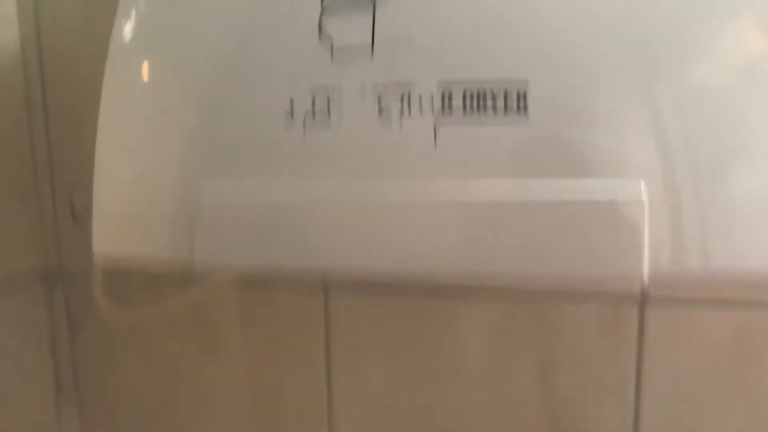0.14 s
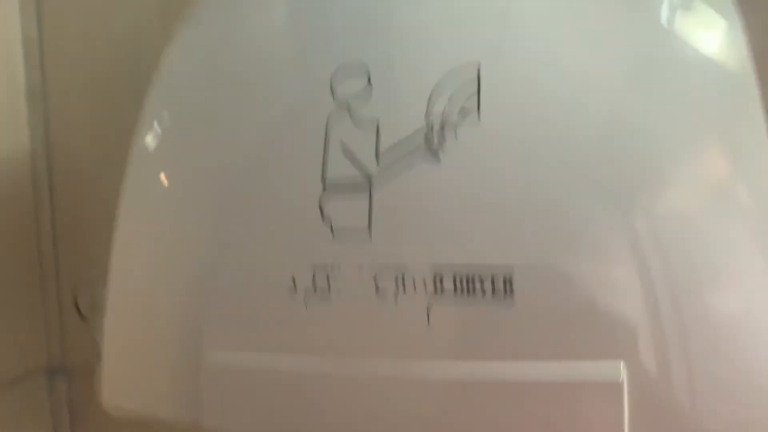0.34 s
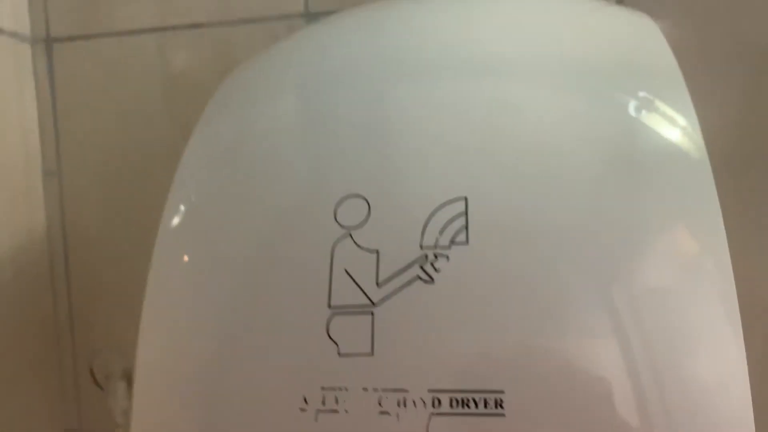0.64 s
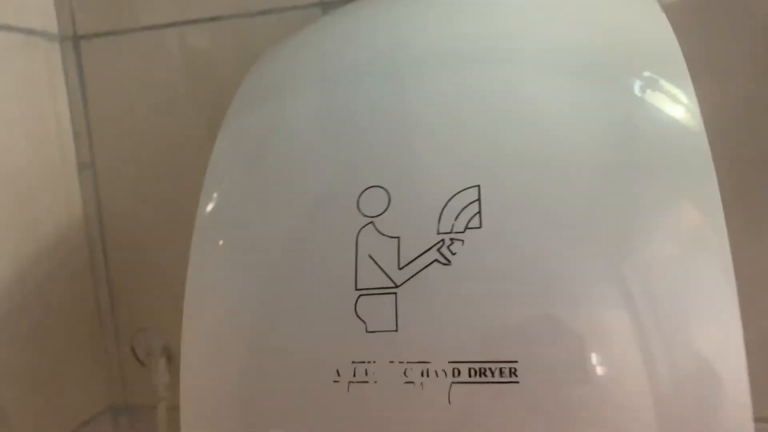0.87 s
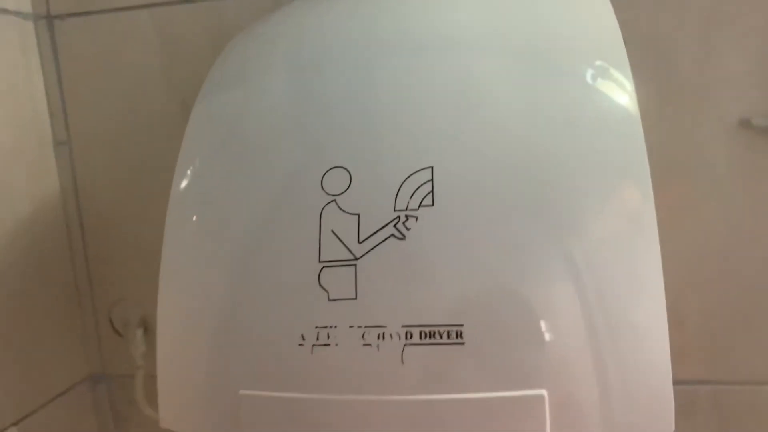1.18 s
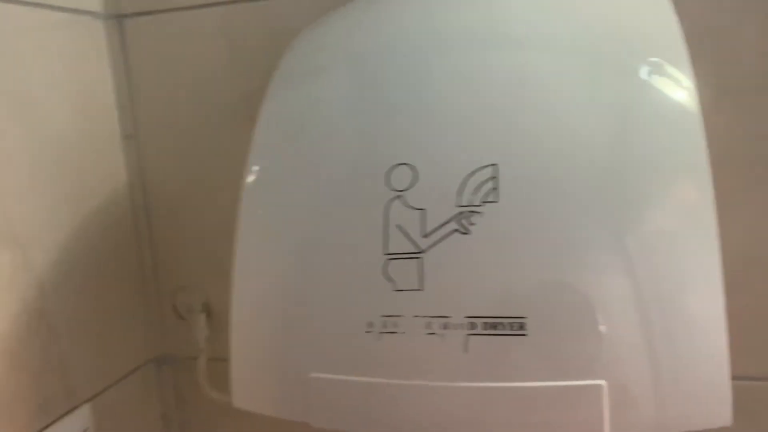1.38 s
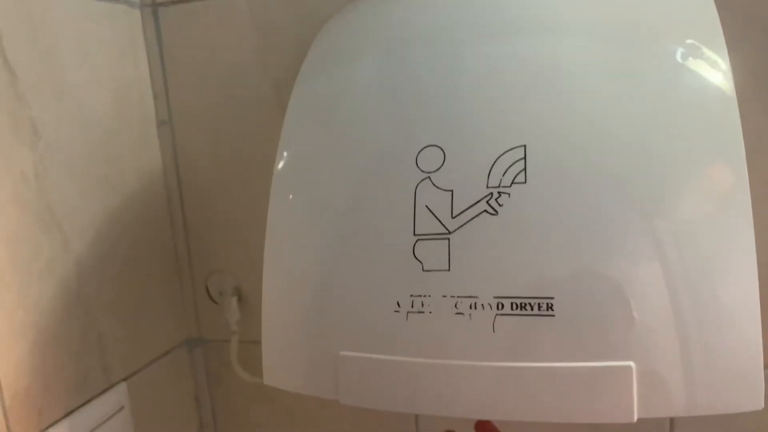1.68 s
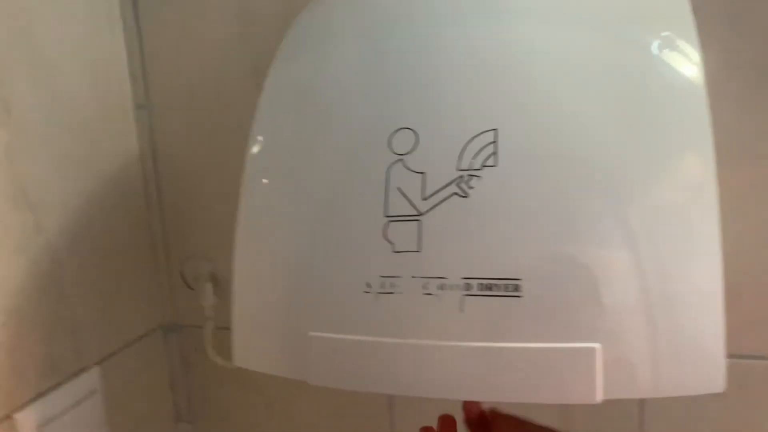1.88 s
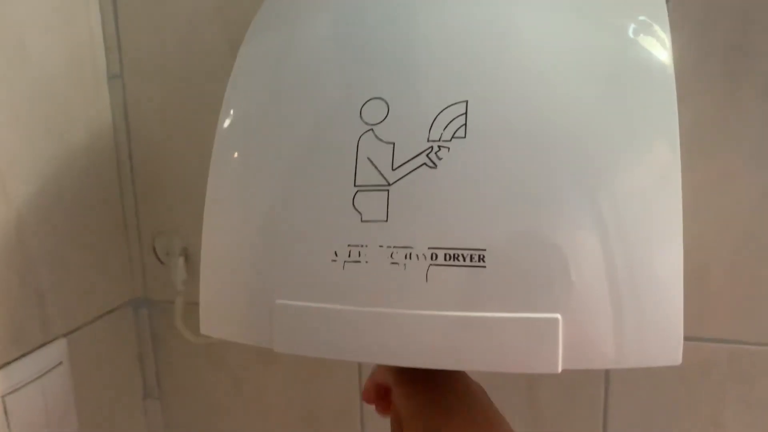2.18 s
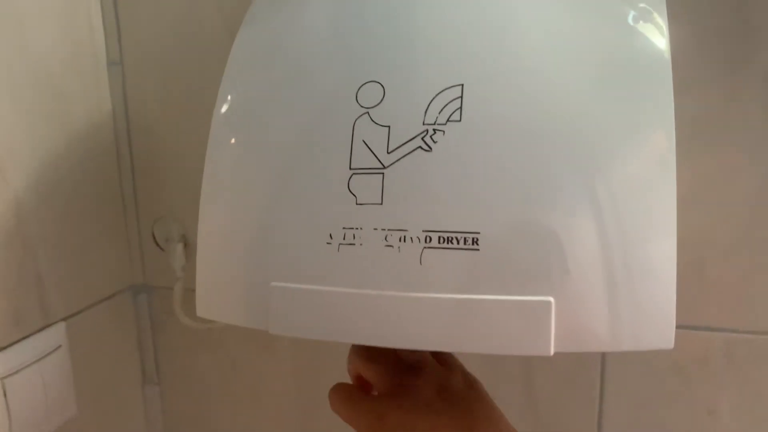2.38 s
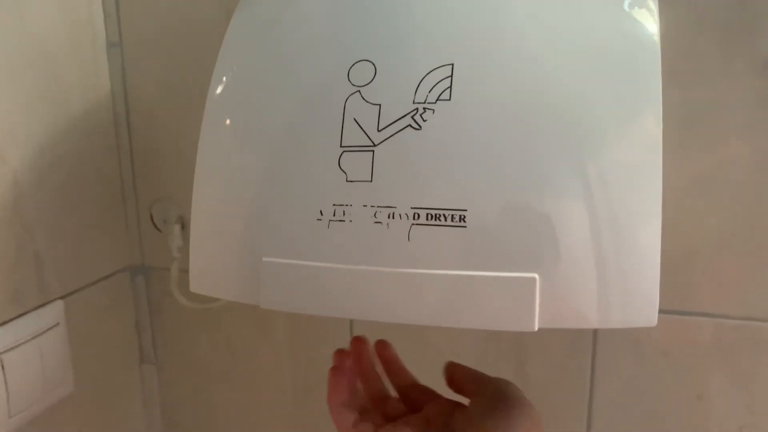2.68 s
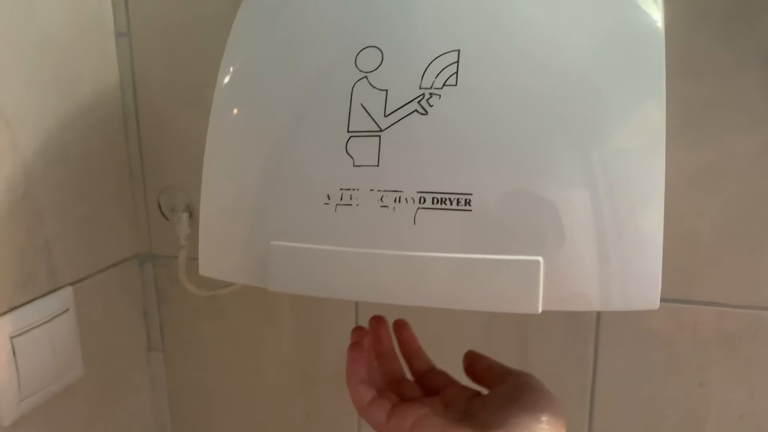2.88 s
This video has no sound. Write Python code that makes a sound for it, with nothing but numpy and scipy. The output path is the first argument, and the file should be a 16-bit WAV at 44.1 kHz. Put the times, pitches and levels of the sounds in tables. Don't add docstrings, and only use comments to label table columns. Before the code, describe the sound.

A hand dryer clatters on with a relay click and blows a steady roaring rush of air.

```python
import sys
import numpy as np
from scipy import signal
from scipy.fft import rfft, irfft, next_fast_len
from scipy.io import wavfile
from scipy.ndimage import uniform_filter1d

SR = 44100
rng = np.random.default_rng(int(sys.argv[2]) if len(sys.argv) > 2 else 0)


def dump_mix(stems):
    frames = np.atleast_2d(stems).T
    limited = np.clip(frames, -1, 1)
    pcm = np.round(limited * 32767).astype(np.int16)
    wavfile.write(sys.argv[1], SR, pcm)


def decibels_to_gain(level_db):
    exponent = np.asarray(level_db, float) / 20
    return 10 ** exponent


N = 133623

# pitch in [Hz], level in [dB].
RUMBLE_SPECTRUM = [(25, -50), (45, -3.5), (100, -8.5), (300, -13.5), (600, -19), (2000, -28), (5000, -45.5),
                   (9000, -66)]
# pitch in [Hz], width in [Hz], lift in [dB].
ROOM_MODES = [(55.5, 13, 13), (83.3, 13, 10), (134.8, 15, 17.5), (207, 5.9, 3.5), (209, 15, 5),
              (275.3, 14, 4.5), (293.8, 9.9, 8.5), (342, 13.7, 7), (381.7, 4.7, 6), (429, 24, 2.5)]
# time in [s], level in [dB].
HUM_LEVEL = [(0, -53.5), (.2, -56), (.3, -49), (.45, -54.5), (.8, -50.5), (1.1, -50.5), (1.6, -50.5),
             (3.03, -61)]
# time in [s], level in [dB].
DRONE_LEVEL = [(0, -77), (.55, -68), (.75, -54.5), (1.1, -53), (1.25, -67), (3.03, -44)]
# time in [s], level in [dB].
DEEP_NOTE_LEVEL = [(0, -42.5), (.25, -50), (.5, -42.5), (.8, -59.5), (3.03, -49)]
# pitch in [Hz], level in [dB].
RUSTLE_SPECTRUM = [(150, -8), (250, -1), (480, 14), (700, 3), (1000, -34)]
# pitch in [Hz], level in [dB].
FAR_SPECTRUM = [(500, -4.5), (1000, -3.5), (1400, -1.5), (2300, -8.5), (4000, -30), (7000, -38)]
# pitch in [Hz], level in [dB].
MIC_HISS_SPECTRUM = [(3000, -31), (7000, -6), (11300, 8), (15600, -6)]
# start in [s], level in [dB], low edge
# in [Hz], high edge in [Hz], decay in [s].
FINGER_TICKS = [(.4385, -41.5, 1300, 3000, 0.0011), (.439, -55, 3000, 5200, .001),
                (.439, -60, 5000, 12000, .001), (.543, -69, 3000, 7000, .001),
                (.6432, -49.5, 3400, 4870, 0.0011), (.644, -48, 700, 3000, .001),
                (.662, -51, 1400, 2400, .001), (.662, -53, 2600, 4500, .001),
                (.663, -65, 6000, 10000, .001), (.676, -64, 7600, 9200, 0.0017),
                (.6805, -46, 1300, 2610, 0.0011), (.6805, -52, 2800, 4200, 0.0012),
                (.681, -55.5, 7800, 9200, .002), (.6815, -60, 5640, 7000, .001),
                (.681, -66, 9500, 14500, .001), (0.6845, -61, 7600, 9300, 0.0012),
                (1.214, -55, 980, 7500, 0.0043), (1.221, -46, 1000, 7500, 0.0044)]
# start in [s], level in [dB], crack in [dB], extra deep ringing in [dB].
RELAY_BLOWS = [
    (1.2254, -28.5, -1.5, -15),
    (1.228, -25, -5.5, -9),
    (1.233, -29.5, -4.5, 4),
    (1.239, -29.5, -5.5, -1),
    (1.2441, -31, -5, -3),
    (1.252, -34, -1.5, -2.5),
]
# pitch in [Hz], level in [dB], time to fall 60 dB in [s].
COVER_MODES = [(321, 0, 0.07), (377, -3, 0.09), (623, -5, .04), (820, 0, 0.04), (900, -2, 0.05),
               (1045, 4, 0.055), (1157, -3, .03), (1580, -3, 0.025), (1737, -1, 0.035), (2017, 0, 0.035),
               (2440, -8, .015), (2960, -14, .012), (6950, -3, 0.018), (11300, -14, 0.02)]
# pitch in [Hz], level in [dB].
CRACK_SPECTRUM = [(600, 4.5), (2000, 3), (4300, -9.5), (8200, -14), (10000, -3), (13000, -2.5),
                  (15700, -0.5), (17000, -6.5)]
# pitch in [Hz], level in [dB], time to fall 60 dB in [s].
REBOUND_MODES = [(890, -40, 0.14), (1050, -43, .12), (2050, -33, 0.1)]
# pitch in [Hz], time to fall 60 dB in [s].
TILE_ECHO = [(250, 1), (1000, 0.75), (4000, 0.56), (12000, 0.32)]
# time in [s], speed from 0 to 1 [share], boom with the hand under the outlet in [dB].
FAN_RUN = [(1.23, 0.43, 5.5), (1.398, 0.33, 3), (1.5, 0.47, 3.5), (1.6, 0.58, 1.5), (1.699, 0.82, -1),
           (1.78, 0.89, 0.5), (1.852, 0.94, 2), (2.0, 0.98, 1), (2.15, 1, 1), (2.3, 1., -1),
           (2.45, 0.98, -1), (2.6, .99, 0), (2.72, 1, 0.5), (2.85, .99, -1.5), (2.97, 0.99, 1.5),
           (3.03, 1., 1)]
# pitch in [Hz], level in [dB].
BOOM_SPECTRUM = [(60, -21), (110, -14), (200, -9), (300, -1.5), (420, -7.5), (600, -17), (1000, -84)]
# pitch in [Hz], level in [dB].
FAN_ROOM_NOTES = [(138, -41), (217, -47.5), (268, -45), (297, -48.5), (322, -48), (378, -54)]
# pitch in [Hz], level in [dB].
FIZZ_SPECTRUM = [(4500, -15), (6500, -5), (8500, 2.5), (11000, -4.5), (13000, -9.5), (15700, -14)]
# pitch in [Hz], level in [dB].
ROAR_SPECTRUM = [(200, -68), (450, -6), (800, -1.5), (1200, -1), (1700, -5), (2200, -14.5), (3200, -21),
                 (5000, -61)]
# pitch in [Hz], level in [dB].
HISS_SPECTRUM = [(1200, -7.5), (2600, -2.5), (4000, -6), (5500, -7.5), (7000, -14), (9000, -70)]
# pitch in [Hz], width in [Hz], lift in [dB].
HOUSING_MODES = [(700, 15, 6.5), (817, 19, 4), (851, 18, 4.5), (896, 16, 6.5), (1079, 38, 5), (1142, 22, 2),
                 (1198, 16, 6), (1609, 49, 8), (1771, 28, 7), (2326, 230, 5), (2700, 45, 1.5),
                 (2950, 45, 6), (3820, 220, 7.5), (4146, 81, 6)]
# time in [s], level change in [dB].
BLADE_SWING_DB = [(1.72, -7), (1.82, 5.5), (1.88, 2), (2.07, -1), (2.15, -3), (2.23, -3), (2.4, 5),
                  (2.5, 3), (2.56, 1), (2.75, 0.5), (3.03, -16)]
# pitch in [Hz], likeness from 0 to 1 [share].
ROOM_LIKENESS = [(100, 0.86), (250, 0.86), (450, 1), (700, 0.4), (1500, 0), (5500, 0.05), (7500, 0.15),
                 (10000, 1.44)]
# pitch in [Hz], likeness from 0 to 1 [share].
FAN_LIKENESS = [(100, 0.52), (200, 0.8), (300, 0.63), (500, 0.19), (1500, 0.12), (5500, 0.037),
                (7500, 0.99), (10000, 0.87)]
# pitch in [Hz], difference in [dB].
LEFT_LEAN = [(150, 1), (700, 1.5), (1600, 2.5), (2300, 1), (5000, -3), (7200, -1)]
# pitch in [Hz], phase in [cycles].
RIGHT_AHEAD = [(6900, 0), (8500, .5), (11050, 1), (13350, 1.5), (15500, 2)]
# time in [s], edge in [Hz].
MONO_BASS_EDGE = [(0, 417), (1.1, 390), (1.5, 283), (1.9, 206), (2.4, 151), (2.7, 92), (3.03, 55)]


def read(points, hz):
    f, value = np.transpose(points)
    return np.interp(np.log(hz + 1), np.log(f + 1), value)


def follow(points, t):
    return np.interp(t, *np.transpose(points))


def evened(x):
    return x / np.sqrt(np.mean(x ** 2) + 1e-20)


def colour(x, spectrum, peaks=()):
    hz = np.fft.rfftfreq(x.shape[-1], 1 / SR)
    lift_db = sum(db / (1 + (2 * (hz - f) / width) ** 2) for f, width, db in peaks)
    return evened(irfft(rfft(x) * decibels_to_gain(read(spectrum, hz) + lift_db), x.shape[-1]))


def air(patchy_db, flicker_db):
    frames = N // 128 + 5
    a, b = rng.standard_normal((2, 2, frames, 257))
    patches = uniform_filter1d(rng.standard_normal((frames, 257)), 25, 0)
    patches = evened(uniform_filter1d(patches, 6, 1))
    flicker = evened(uniform_filter1d(rng.standard_normal((frames, 1)), 8, 0))
    z = (a + 1j * b) * decibels_to_gain(patchy_db * patches + flicker_db * flicker)
    noise = signal.istft(z.transpose(0, 2, 1), nperseg=512, noverlap=384)[1]
    return evened(noise[:, :N])


def whistle(hz, width_hz, waver=0.5):
    r = np.exp(-np.pi * width_hz / SR)
    noise = rng.standard_normal((2, N)) + 1j * rng.standard_normal((2, N))
    slow = signal.lfilter([1 - r], [1, -r], noise)
    slow = 1 + waver * slow / np.sqrt(np.mean(abs(slow) ** 2))
    turns = np.cumsum(hz * np.ones(N)) / SR
    return evened((slow * np.exp(2j * np.pi * turns)).real)


def ringing(modes, t):
    return sum(decibels_to_gain(db - 60 * t / t60) * np.sin(2 * np.pi * (hz * t + rng.random()))
               for hz, db, t60 in modes)


def add(mix, s, sound):
    part = mix[round(s * SR):][:len(sound)]
    part += sound[:len(part)]


def room_tone():
    t = np.arange(N) / SR
    rumble = decibels_to_gain(-42.5) * colour(air(0.8, 0.1), RUMBLE_SPECTRUM, ROOM_MODES)
    hum = decibels_to_gain(follow(HUM_LEVEL, t)) * whistle(296.8, 5.4, waver=0.44)
    drone = decibels_to_gain(follow(DRONE_LEVEL, t)) * whistle(197, 16.0, waver=0.66)
    deep_note = decibels_to_gain(follow(DEEP_NOTE_LEVEL, t)) * whistle(84.9, 3.3)
    rustle_db = -55.5 - 6.3 * ((t - 0.7) / 0.13) ** 2
    rustle = decibels_to_gain(rustle_db) * colour(air(1.7, 1.1), RUSTLE_SPECTRUM)
    far_t60 = 1.7
    far = decibels_to_gain(-48 - 60 * t / far_t60) * colour(air(0.62, 0.67), FAR_SPECTRUM)
    mic_hiss = decibels_to_gain(-82.5) * colour(rng.standard_normal((2, N)), MIC_HISS_SPECTRUM)
    return rumble + hum + drone + deep_note + rustle + far + mic_hiss


def ticks():
    t, out = np.arange(1200) / SR, np.zeros((2, N))
    rise_s = 0.00073
    for s, db, low_hz, high_hz, decay_s in FINGER_TICKS:
        band = signal.butter(3, [low_hz, high_hz], "bandpass", fs=SR, output="sos")
        shape = np.minimum(t / rise_s, 1) * np.exp(-t / decay_s)
        both = rng.standard_normal(len(t))
        for side in out:
            noise = both + 1.1 * rng.standard_normal(len(t))
            puff = signal.sosfilt(band, noise * shape)
            add(side, s, decibels_to_gain(db) * puff / abs(puff).max())
    return out


def relay():
    t, out = np.arange(9000) / SR, np.zeros(N)
    rise_s, crack_decay_s = 0.0017, 0.0048
    for s, db, crack_db, deep_db in RELAY_BLOWS:
        modes = [(hz, d + deep_db * (hz < 1500), t60) for hz, d, t60 in COVER_MODES]
        ring = ringing(modes, t) / 2.33
        crack = colour(rng.standard_normal(len(t)), CRACK_SPECTRUM) * np.exp(-t / crack_decay_s)
        add(out, s, decibels_to_gain(db) * np.minimum(t / rise_s, 1) * (ring + decibels_to_gain(crack_db) * crack))
    return out


def rebound():
    t, out = np.arange(12000) / SR, np.zeros(N)
    rise_s = 0.013
    swell = np.minimum(t / rise_s, 1) ** 2
    add(out, 1.321, np.sqrt(2) * swell * ringing(REBOUND_MODES, t))
    return out


def tiles(x):
    taps = np.zeros((2, SR))
    at = np.arange(100, SR - 20, 20) + rng.integers(0, 20, (2, (SR - 101) // 20))
    np.put_along_axis(taps, at, rng.choice([-1., 1.], at.shape), 1)
    hz, t, z = signal.stft(taps, SR, nperseg=256)
    fade = decibels_to_gain(-60 * t / read(TILE_ECHO, hz)[:, None])
    tail = signal.istft(z * fade, SR, nperseg=256)[1]
    return signal.fftconvolve(x[None], tail / np.linalg.norm(tail[0]), axes=1)[:, :N]


def fan():
    t, (s, speed, hand_db) = np.arange(N) / SR, np.transpose(FAN_RUN)
    speed = np.clip(np.interp(t, s, speed, left=0), 0, 1.2)
    speed = uniform_filter1d(speed, 2000)
    hand_db = np.interp(t, s, hand_db)
    boom = decibels_to_gain(-35.5 + hand_db) * speed ** 1.85 * colour(air(1.94, 0.79), BOOM_SPECTRUM, ROOM_MODES)
    notes = sum(decibels_to_gain(db) * whistle(hz, 24.5, waver=0.71) for hz, db in FAN_ROOM_NOTES)
    notes = decibels_to_gain(3.2 * hand_db) * speed ** 2.26 * notes
    fizz = decibels_to_gain(-51.5) * speed ** 6.1 * colour(air(0.76, 0.87), FIZZ_SPECTRUM)
    roar = decibels_to_gain(-32.5) * speed ** 1.95 * colour(air(1.45, 0.35), ROAR_SPECTRUM, HOUSING_MODES)
    hiss = decibels_to_gain(-42.5) * speed ** 3.08 * colour(air(1.0, 0.48), HISS_SPECTRUM, HOUSING_MODES)
    full_hz, run_up_s = 761, 0.173
    blade_hz = full_hz * (1 - np.exp(-np.maximum(t - s[0], 0) / run_up_s))
    blade_db = -44 + follow(BLADE_SWING_DB, t)
    blade = decibels_to_gain(blade_db) * speed ** 3.2 * whistle(blade_hz, 5, waver=0.57)
    return boom + notes + fizz + roar + hiss + blade


def pair(x, likeness):
    size = next_fast_len(N + 4096)
    hz, (left, other) = np.fft.rfftfreq(size, 1 / SR), rfft(x, size)
    same = np.clip(read(likeness, hz), 0, 1)
    lean = decibels_to_gain(read(LEFT_LEAN, hz) / 2)
    ahead = np.exp(2j * np.pi * read(RIGHT_AHEAD, hz))
    right = same * ahead * left + np.sqrt(1 - same ** 2) * other
    return irfft(np.array([left * lean, right / lean]), size)[:, :N]


def scene():
    click = relay()
    room = room_tone() + decibels_to_gain(0.5) * click + decibels_to_gain(2.5) * tiles(click)
    mix = pair(room, ROOM_LIKENESS) + pair(fan(), FAN_LIKENESS) + ticks() + rebound()
    fade_in = np.minimum(np.arange(N) / 300, 1)
    return mix * fade_in


def top_cut(x):
    return signal.sosfilt(signal.butter(12, 16940, fs=SR, output="sos"), x)


def record(dry):
    mid, side = (dry[0] + dry[1]) / 2, (dry[0] - dry[1]) / 2
    hz, t, z = signal.stft(side, SR, nperseg=2048, noverlap=1536)
    octaves = np.log2((hz[:, None] + 1) / follow(MONO_BASS_EDGE, t))
    slope_db = 102
    z = z * decibels_to_gain(slope_db * np.minimum(octaves, 0))
    side = signal.istft(z, SR, nperseg=2048, noverlap=1536)[1][:N]
    treble_cut = signal.firwin(511, 15750, window=("kaiser", 8), fs=SR)
    mix = signal.oaconvolve([mid + side, mid - side], treble_cut[None], "same")
    return top_cut(mix)


dry = scene()
out = record(dry)
dump_mix(out)
```